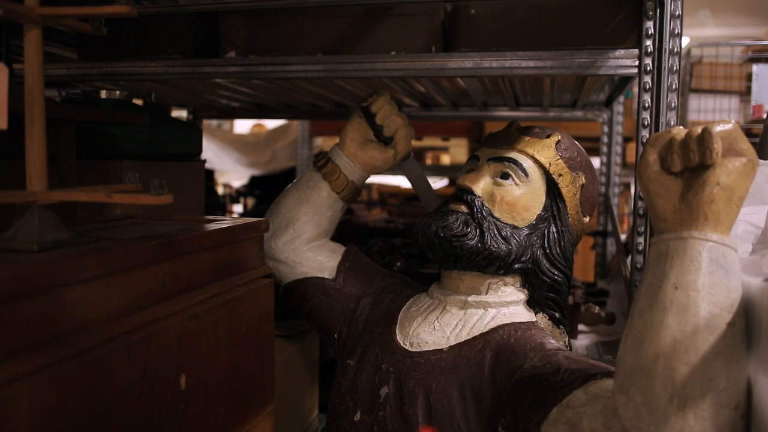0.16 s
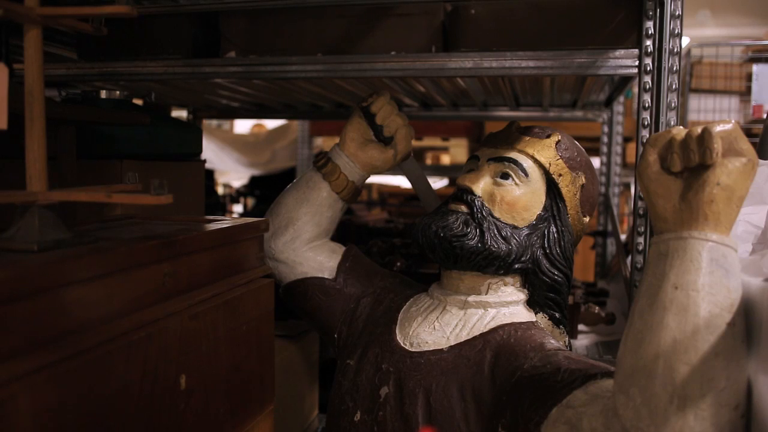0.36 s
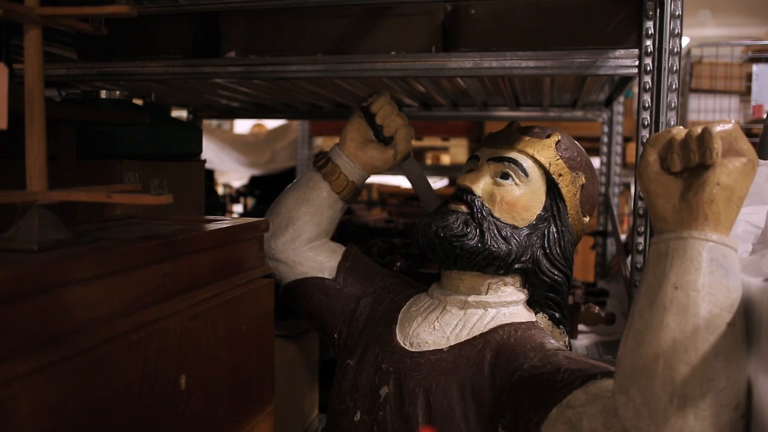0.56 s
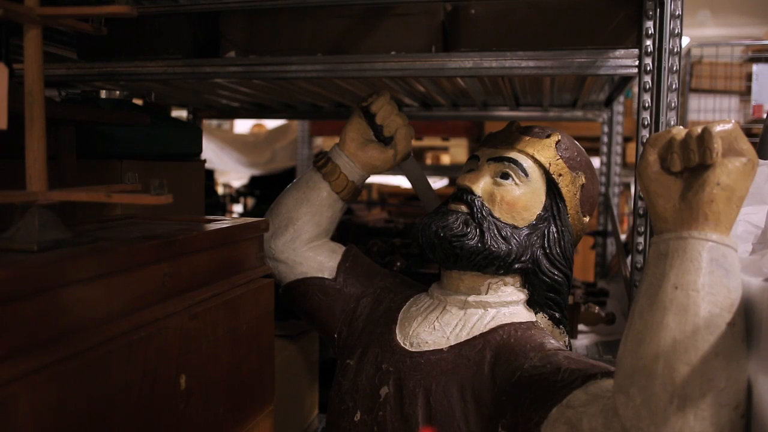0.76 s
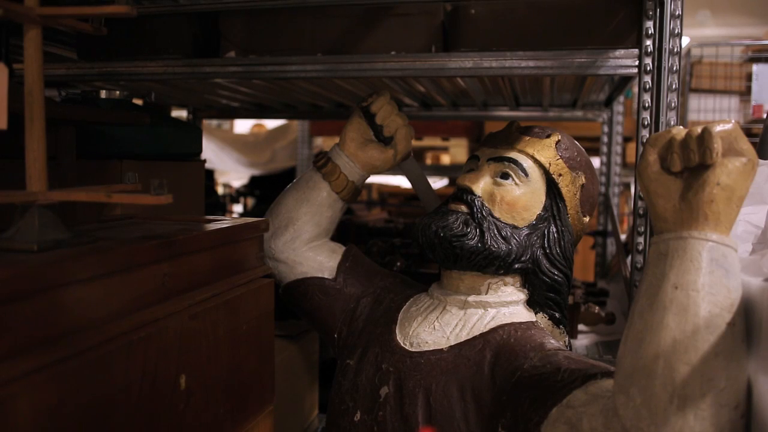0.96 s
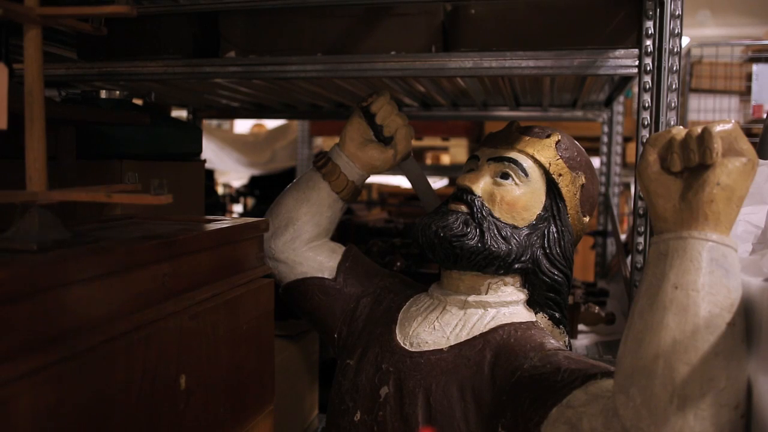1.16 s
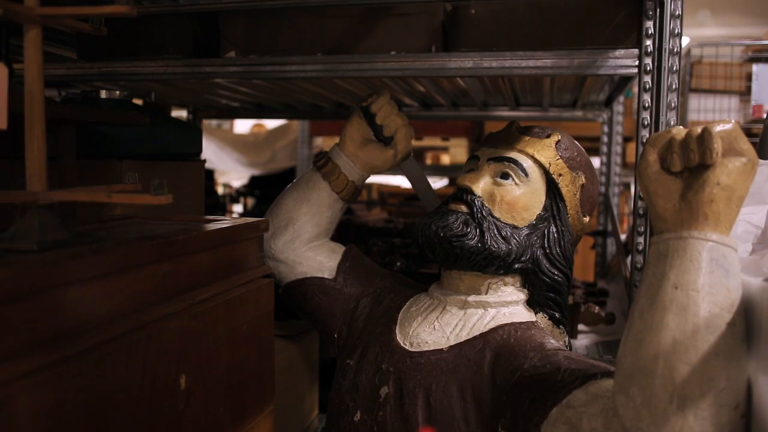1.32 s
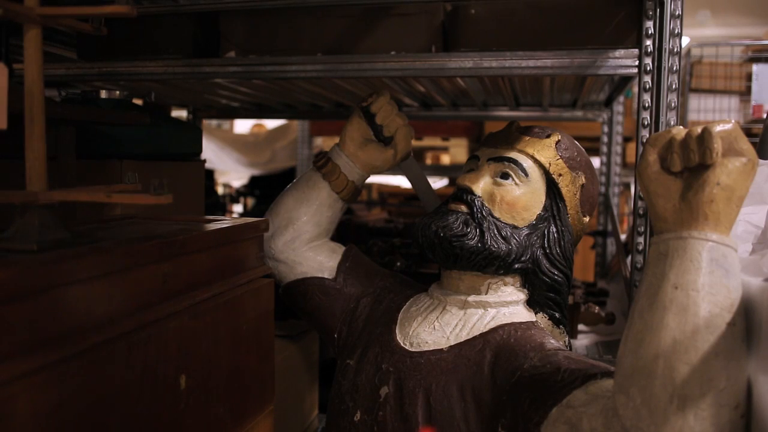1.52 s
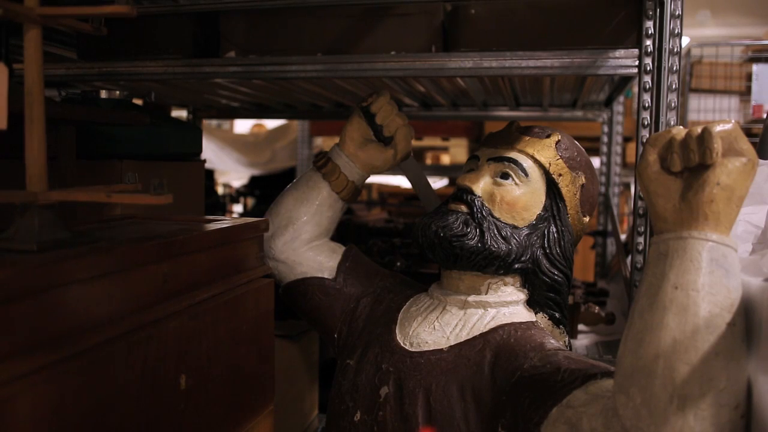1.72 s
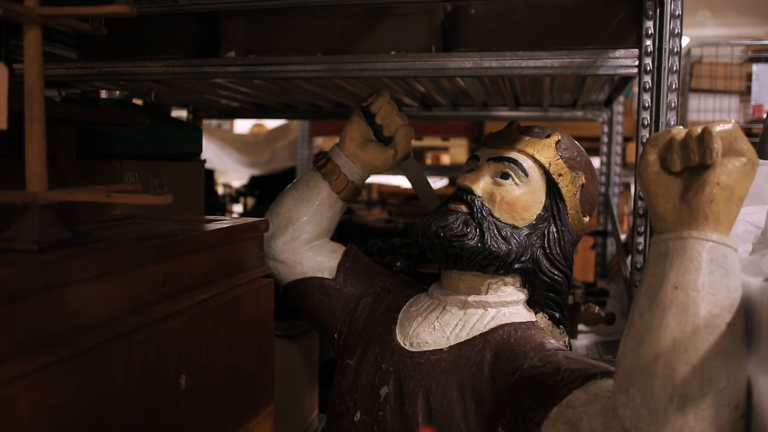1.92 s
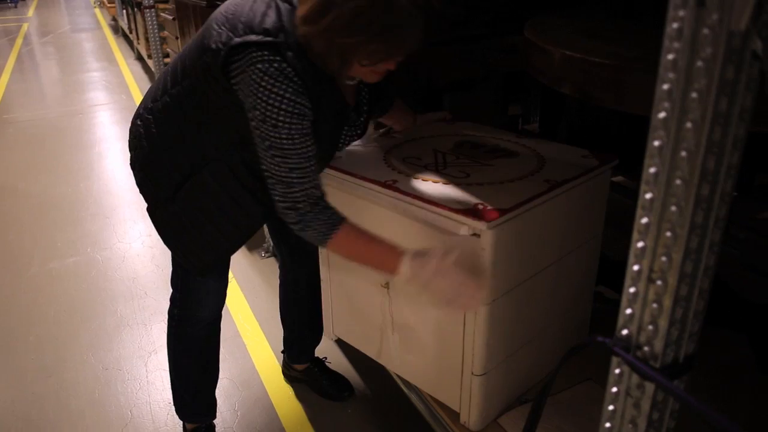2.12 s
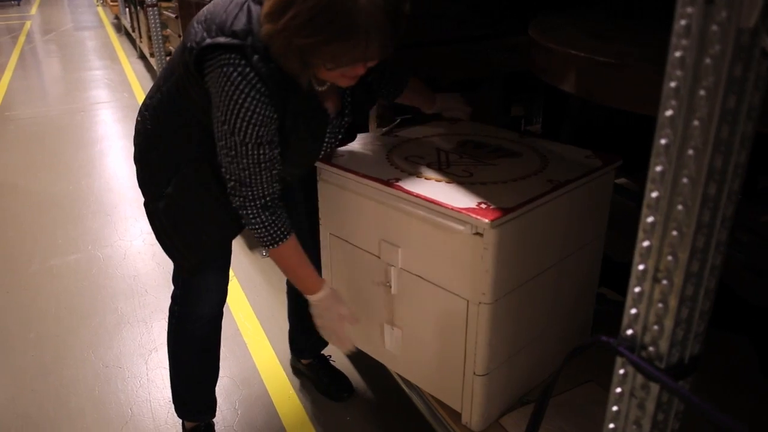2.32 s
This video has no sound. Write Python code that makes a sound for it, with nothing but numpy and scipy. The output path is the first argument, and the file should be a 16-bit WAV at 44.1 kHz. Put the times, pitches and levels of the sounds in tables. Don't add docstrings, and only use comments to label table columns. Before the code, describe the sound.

Heavy wooden furniture drags over a board with a juddering, groaning scrape, after soft rustles and knocks.

```python
import sys
import numpy as np
from scipy import signal
from scipy.io import wavfile
from scipy.ndimage import uniform_filter1d

SR = 44100
rng = np.random.default_rng(int(sys.argv[2]) if len(sys.argv) > 2 else 0)


def dump(signal):
    limited = np.clip(np.atleast_2d(signal).T, -1, 1)
    pcm = np.round(limited * 32767).astype(np.int16)
    wavfile.write(sys.argv[1], SR, pcm)


def makeup_ratio(level_db):
    decades = np.asarray(level_db, float) / 20
    return 10 ** decades


N = 109368
T = np.arange(N) / SR


def evened(x):
    return x / np.sqrt(np.mean(x ** 2) + 1e-20)


def noise():
    return rng.standard_normal(N)


def read(points, hz):
    f, value = np.transpose(points)
    return np.interp(np.log(hz + 1), np.log(f + 1), value)


def colour(x, points):
    hz = abs(np.fft.fftfreq(8192, 1 / SR))
    log_gain = np.log(makeup_ratio(read(points, hz)) + 1e-5)
    phase = -signal.hilbert(log_gain).imag
    taps = np.fft.ifft(np.exp(log_gain + 1j * phase)).real[:4096]
    return evened(signal.oaconvolve(x, taps)[:len(x)])


def resonance(x, hz, width_hz):
    r = np.exp(-np.pi * width_hz / SR)
    return evened(signal.lfilter([1, 0, -1], [1, -2 * r * np.cos(2 * np.pi * hz / SR), r * r], x))


def stroke(s, db):
    fade_in = np.clip((T - s[0]) / 0.036, 0, 1)
    fade_out = np.clip((s[-1] - T) / 0.011 + 1, 0, 1)
    return makeup_ratio(np.interp(T, s, db)) * fade_in * fade_out


def swell(middle_s, half_s):
    return np.exp(-((T - middle_s) / half_s) ** 2)


def slips():
    slips_per_s, spread_db, judder_db = 3200, 2.8, 1.3
    band = signal.butter(2, [20, 90], "bandpass", fs=SR, output="sos")
    judder = evened(signal.sosfilt(band, noise()))
    size = makeup_ratio(spread_db * np.minimum(rng.exponential(1, N), 3.5)) * rng.choice([-1, 1], N)
    return size * (rng.random(N) < slips_per_s / SR) * makeup_ratio(judder_db * judder)


# pitch_hz, left_minus_right_db
STEREO_LEAN = [(60, -8), (180, 1), (550, -3), (1650, -1), (4970, -0.5), (15000, -0.5)]


def spread(x, same):
    hz, _, z = signal.stft(x, SR, nperseg=256)
    z = z / np.sqrt(2)
    likeness = np.clip(read(same, hz), 0, 1)[:, None]
    shared = np.sqrt(1 + likeness)
    scrambled = np.exp(2j * np.pi * rng.random(z.shape)) * np.sqrt(1 - likeness)
    lean = makeup_ratio(read(STEREO_LEAN, hz) / 2)[:, None]
    pair = np.array([z * (shared + scrambled) * lean, z * (shared - scrambled) / lean])
    return signal.istft(pair, SR, nperseg=256)[1][:, :N]


# pitch_hz, level_db (per Hz)
HISS = [(30, -20), (70, 4.5), (155, 5), (260, -2.5), (1000, -8), (2200, -12.5), (4500, -19), (15700, -27.5)]
# pitch_hz, left_right_likeness (0 to 1)
HISS_LIKENESS = [(60, 0.29), (240, 0.11), (950, 0.073), (3770, 0.017), (15000, 0.024)]
# time_s, level_db
THROB = [
    (0.0, -75),
    (0.07, -69),
    (1.21, -60.5),
    (1.27, -63),
    (1.99, -57.5),
    (2.11, -70),
    (2.15, -57.5),
    (2.48, -62.5),
]


def air():
    throb_hz, wander_hz, flutter_db = 34.5, 4, 2.5
    hiss_db = -64.5 - 2.5 * (T < 0.026) + 6.5 * np.clip((T - 2.05) / 0.082, 0, 1)
    wander, flutter = (evened(uniform_filter1d(uniform_filter1d(noise(), 900), 900)) for _ in range(2))
    throb = np.sqrt(2) * np.sin(2 * np.pi * np.cumsum(throb_hz + wander_hz * wander) / SR)
    throb = throb * makeup_ratio(np.interp(T, *np.transpose(THROB)) + flutter_db * flutter)
    hiss = spread(makeup_ratio(hiss_db) * colour(noise(), HISS), HISS_LIKENESS)
    return hiss + throb * makeup_ratio([[-1], [1]])


# middle_s, half_length_s, level_db, sheen_db
RUSTLES = [(0.136, 0.053, -68.5, 1.5), (0.224, 0.063, -74.5, 2), (0.308, 0.027, -70, 4),
           (0.358, 0.039, -63, -4), (0.485, 0.044, -65.5, -0.5), (0.595, 0.038, -68, -1.5),
           (0.698, 0.055, -70, -3), (0.772, 0.026, -73, 0), (0.99, 0.021, -90, 11), (1.165, 0.26, -75, 1.5),
           (2.206, 0.0098, -64, -13), (2.404, .08, -68.5, -24)]
# pitch_hz, level_db (per Hz)
CLOTH = [(200, -15), (350, -2.5), (1000, -7.5), (2500, -4), (5500, -10), (8000, -22), (15500, -27)]
# pitch_hz, level_db (per Hz)
SHEEN = [(5000, -41), (7500, 0), (9500, 0), (12000, -11), (15500, -16)]


def sleeves():
    crackle = noise() * makeup_ratio(1.9 * evened(uniform_filter1d(noise(), 60)))
    body, sheen = colour(crackle, CLOTH), colour(crackle, SHEEN)
    return sum(makeup_ratio(db) * swell(s, half_s) * (body + makeup_ratio(sheen_db - 7) * sheen)
               for s, half_s, db, sheen_db in RUSTLES)


# start_s, level_db, pitch_hz, t60_s
KNOCKS = [(.0337, -42, 330, .017), (.0337, -51, 900, .012), (.0339, -57, 3900, .02), (.0405, -52, 650, .02),
          (.0405, -58, 2000, .02), (.054, -52, 500, .02), (.3115, -51, 1700, .006), (.791, -60, 930, .04),
          (.79, -64, 2300, .02), (.801, -60, 960, .04), (.835, -61, 930, .04), (.99, -56, 560, .05),
          (.985, -61, 1050, .03), (1.008, -55, 450, .055), (1.025, -60, 520, .05), (.8, -65, 1500, .025),
          (.82, -63, 1100, .03), (1.088, -52, 540, .06), (1.089, -55, 850, .04), (1.097, -51, 600, .05),
          (1.118, -45, 380, .07), (1.117, -52, 680, .05), (1.133, -53, 1110, .045), (1.137, -49, 430, .06),
          (1.15, -50, 300, .06), (1.166, -51, 950, .035), (1.167, -54, 720, .06), (1.18, -50, 260, .07),
          (1.269, -54, 400, .03), (1.833, -36, 800, .02)]
# pitch_hz, level_db (per Hz)
SCATTER = [(100, -25), (350, -3), (900, 0), (2500, -6), (4500, -10), (7000, -30)]


def knocks():
    rise_s, scatter_db, scatter_t60_s = 0.0002, -20, 0.066
    out, clatter = np.zeros(N), colour(noise(), SCATTER)
    for s, db, hz, t60_s in KNOCKS:
        t = np.maximum(T - s, 0)
        tone = makeup_ratio(-60 * t / t60_s) * np.cos(2 * np.pi * hz * t)
        scatter = makeup_ratio(scatter_db - 60 * t / scatter_t60_s) * clatter
        out += np.minimum(t / rise_s, 1) * makeup_ratio(db) * (tone + scatter)
    return out


# time_s, level_db
CREEP = [
    (.95, -73),
    (.995, -67.5),
    (1.03, -69),
    (1.08, -87),
    (1.11, -73),
    (1.125, -59.5),
    (1.19, -57),
    (1.24, -68),
    (1.276, -52.5),
]
# pitch_hz, level_db (per Hz)
GROAN = [(53, -44), (90, -2), (140, -3.5), (209, -9), (385, -4), (519, -22.5), (708, -16), (2000, -26),
         (2600, -61), (4400, -120)]


def creep():
    return stroke(*np.transpose(CREEP)) * colour(slips(), GROAN)


# middle_s, half_length_s, pitch_hz, peak_db
CATCHES = [(1.306, 0.005, 419, -47.5), (1.38, 0.013, 872, -50), (1.384, 0.011, 764, -44),
           (1.391, 0.016, 684, -53), (1.413, 0.021, 738, -45), (1.419, 0.015, 248, -47.5),
           (1.453, 0.0069, 355, -46.5), (1.461, 0.036, 684, -51.5), (1.442, 0.01, 759, -43),
           (1.478, .014, 754, -48.5), (1.485, .011, 921, -47), (1.533, 0.029, 743, -42.5),
           (1.56, 0.043, 134, -47.5), (1.563, 0.0082, 775, -38.5), (1.567, 0.019, 231, -54),
           (1.613, 0.0081, 689, -42.5), (1.639, 0.0067, 985, -43.5), (1.65, .011, 280, -47.5),
           (1.666, 0.0072, 958, -38), (1.708, 0.0089, 684, -51), (1.716, 0.014, 872, -44),
           (1.719, 0.013, 393, -48), (1.722, 0.014, 947, -45), (1.746, 0.011, 904, -41.5),
           (1.771, 0.019, 425, -49), (1.78, 0.016, 732, -43), (1.842, .035, 670, -41),
           (1.846, 0.0071, 501, -41.5), (1.853, .022, 431, -40.5), (1.866, 0.022, 964, -40.5),
           (1.89, .008, 1038, -42), (1.851, 0.006, 599, -42), (1.89, .014, 560, -36),
           (1.908, 0.0069, 380, -38.5), (1.925, 0.035, 748, -43), (1.926, 0.0089, 958, -36.5),
           (1.927, 0.018, 431, -50), (1.953, 0.028, 937, -43.5), (1.977, 0.0068, 720, -37.5),
           (2.031, 0.011, 409, -38.5), (2.058, 0.016, 118, -43.5), (2.061, 0.012, 603, -41),
           (2.134, .025, 226, -45), (2.136, 0.023, 129, -46.5), (2.181, 0.0087, 215, -45)]


def catches():
    pitch_wobble, rough_db = 0.025, 1.5
    wobble, rough = (evened(uniform_filter1d(noise(), 120)) for _ in range(2))
    clock = np.cumsum(1 + pitch_wobble * wobble) / SR
    out = np.zeros(N)
    for s, half_s, hz, db in CATCHES:
        shift = round(hz)
        level = makeup_ratio(db - 2 + rough_db * np.roll(rough, shift))
        out += level * swell(s, half_s) * np.sin(2 * np.pi * hz * np.roll(clock, shift))
    return out


# pitch_hz, level_db, t60_s
SNAP_RINGS = [(438, 0.5, 0.041), (897, 3.5, 0.068), (969, -2.5, 0.12), (1227, -0.5, 0.072),
              (1757, -7, 0.095), (2087, -10.5, 0.06), (2530, -6, 0.049), (2990, -11, 0.08),
              (3420, -11, 0.041), (4160, -2, 0.027), (4600, -7, 0.034), (6207, -9, 0.029)]
# pitch_hz, level_db (per Hz)
CRACK = [(120, -32), (200, -13.5), (575, -8.5), (800, 0.5), (1110, -5), (2510, -7.5), (6500, -21),
         (15500, -40)]


def snap():
    start_s, level_db, ring_rise_s = 1.279, -36, 0.0049
    crack_db, crack_t60_s, crack_rise_s = -3.5, 0.16, 0.003
    t = np.maximum(T - start_s, 0)
    rings = sum(makeup_ratio(db - 60 * t / t60_s) * np.sin(2 * np.pi * (hz * t + rng.random()))
                for hz, db, t60_s in SNAP_RINGS)
    crack = makeup_ratio(crack_db - 60 * t / crack_t60_s) * colour(noise(), CRACK)
    return makeup_ratio(level_db) * (np.minimum(t / ring_rise_s, 1) * rings + np.minimum(t / crack_rise_s, 1) * crack)


# time_s, scrape_db, grit_db and rumble_db (both against the scrape)
DRAG = [
    (1.31, -26, -20, -9),
    (1.332, -53.5, -8, -12.5),
    (1.438, -47, -6, -8.5),
    (1.552, -48, -7, -5),
    (1.736, -43, -8, -11),
    (1.81, -42.5, -6.5, -13.5),
]
# time_s, scrape_db, grit_db and rumble_db (both against the scrape)
HEAVE = [
    (1.828, -41, -7.5, -19),
    (1.836, -38, -10.5, -14.5),
    (1.871, -39.5, -9.5, -9.5),
    (1.909, -40, -7, -19),
    (1.941, -38.5, -9, -10),
    (2.063, -41, -8, -11.5),
    (2.171, -56.5, -16, -1),
    (2.27, -78, -3, -7),
]
# pitch_hz, width_hz, back_db (feet far back), edge_db (feet near the edge)
PANELS = [(249.6, 23, -5.5, -2.5), (271.6, 19, 1.5, -2), (409, 22, -5.5, -3), (503, 22, -4, -0.5),
          (570, 62, -21, -7), (684, 6.9, 4, -2), (743, 27, 3, -1.5), (928, 45, 0.5, -2),
          (956.7, 16.4, 1.5, 0), (1180, 47, -39, -26), (1235, 9.4, -2, -3), (1347, 61, -5.5, -9),
          (1790, 32, -29, -21), (2305, 62, -40, -5)]
# pitch_hz, level_db (per Hz)
BOARD = [(88, -50), (150, -7), (319, -2), (418, 3), (798, -3), (963, 3), (2500, -16), (3250, -60),
         (5500, -120)]
# pitch_hz, level_db (per Hz)
GRIT = [(1060, -20), (1800, -3.5), (2750, -7), (3200, -9.5), (4160, -10), (5750, -18.5), (12400, -31.5),
        (15500, -41)]
# pitch_hz, width_hz, level_db
CARCASS = [(106, 14, -1), (139.3, 24, -0.5), (210.4, 21, 1.5)]


def scrape():
    s, level_db, grit_db, rumble_db = np.transpose(list(DRAG) + list(HEAVE))
    drive = slips()
    edge = np.clip((T - 1.59) / (1.9 - 1.59), 0, 1)
    panels = sum(makeup_ratio(back_db + (edge_db - back_db) * edge) * (-1) ** k * resonance(drive, hz, width_hz)
                 for k, (hz, width_hz, back_db, edge_db) in enumerate(PANELS))
    wood = makeup_ratio(-3) * evened(panels) + makeup_ratio(-3) * colour(drive, BOARD)
    grit = colour(0.55 * evened(drive) + noise(), GRIT)
    shake = slips()
    rumble = evened(sum((-1) ** k * makeup_ratio(db) * resonance(shake, hz, width_hz)
                        for k, (hz, width_hz, db) in enumerate(CARCASS)))
    return (stroke(s, level_db) * wood + stroke(s, level_db + grit_db) * grit
            + stroke(s, level_db + rumble_db) * rumble)


def room(x):
    level_db, t60_s = -14.5, 0.37
    t = np.arange(SR // 2) / SR
    reflections = rng.choice([-1., 1.], len(t)) * (rng.random(len(t)) < .05)
    tail = reflections * makeup_ratio(-60 * t / t60_s) * (t > .004)
    tail = signal.lfilter([1], [1, -.6], tail)
    return makeup_ratio(level_db) * signal.fftconvolve(x, tail / np.linalg.norm(tail))[:N]


# pitch_hz, left_right_likeness (0 to 1)
NEAR_LIKENESS = [(60, 0.73), (180, 0.86), (550, 0.79), (1650, 0.64), (4970, 0.28), (15000, 0.22)]


def scene():
    near = sleeves() + knocks() + creep() + catches() + snap() + scrape()
    return air() + spread(near + room(near), NEAR_LIKENESS)


def low_pass(x):
    return signal.sosfilt(signal.butter(12, 15760, fs=SR, output="sos"), x)


def record(dry):
    return low_pass(dry)


dry = scene()
out = record(dry)
dump(out)
```